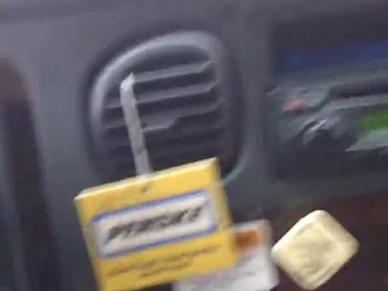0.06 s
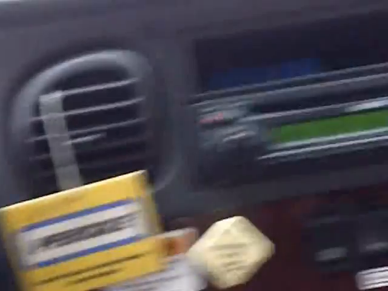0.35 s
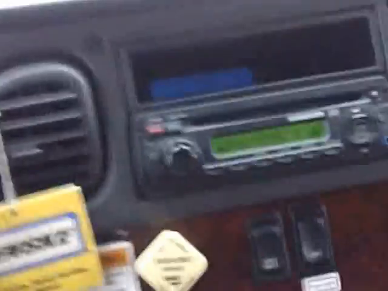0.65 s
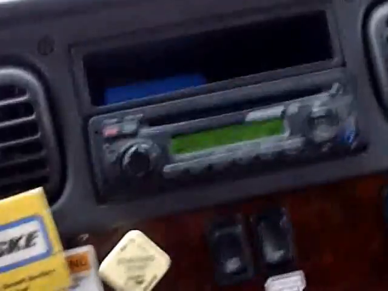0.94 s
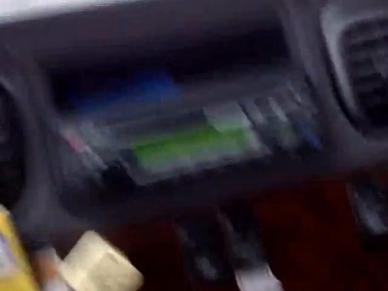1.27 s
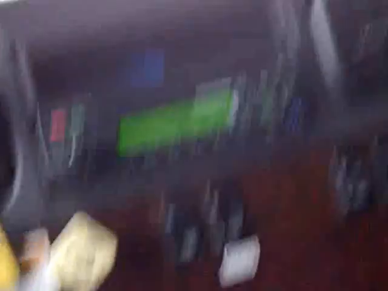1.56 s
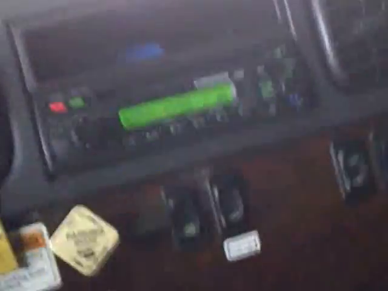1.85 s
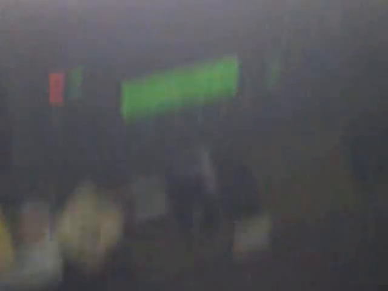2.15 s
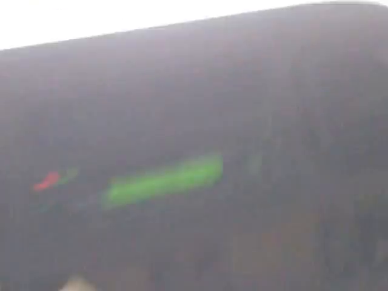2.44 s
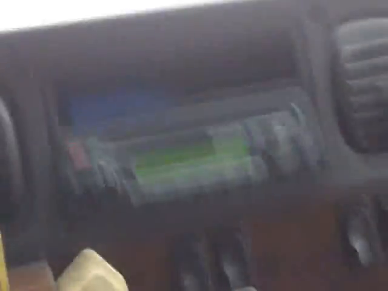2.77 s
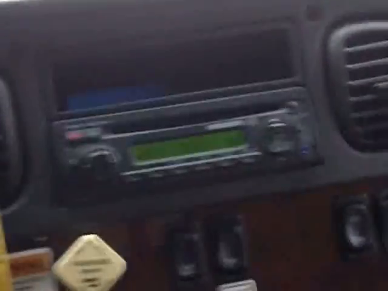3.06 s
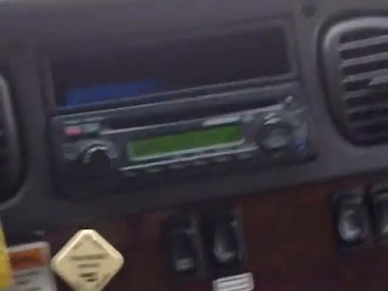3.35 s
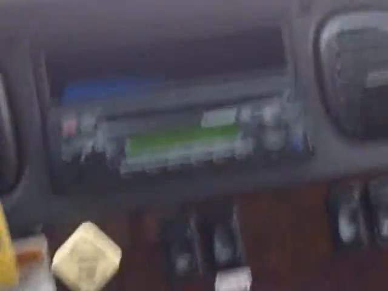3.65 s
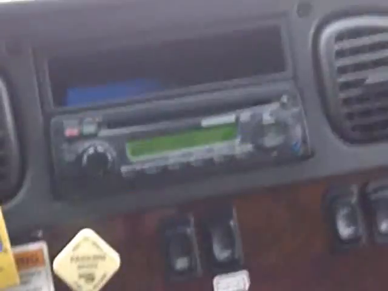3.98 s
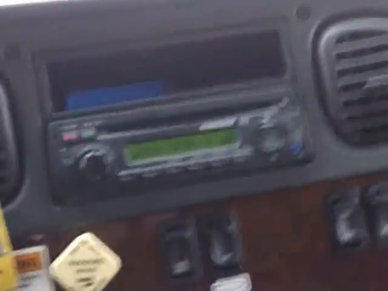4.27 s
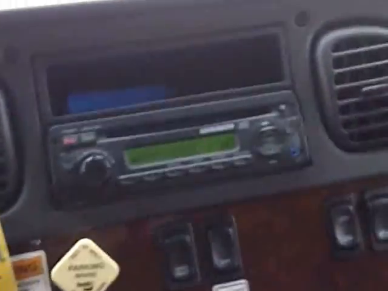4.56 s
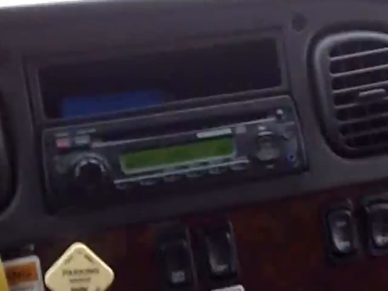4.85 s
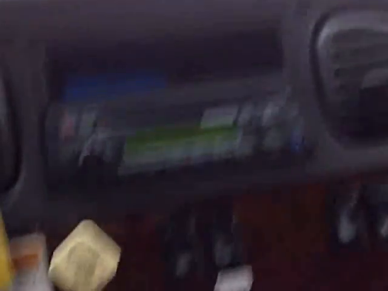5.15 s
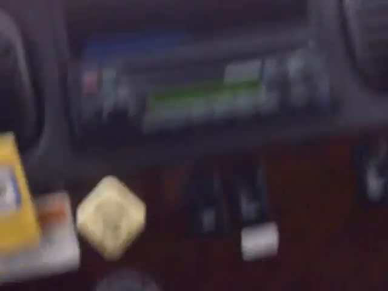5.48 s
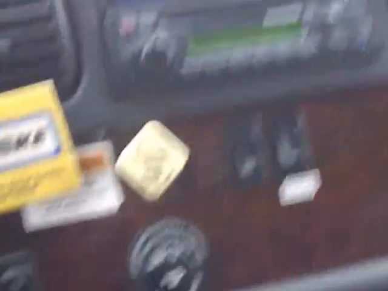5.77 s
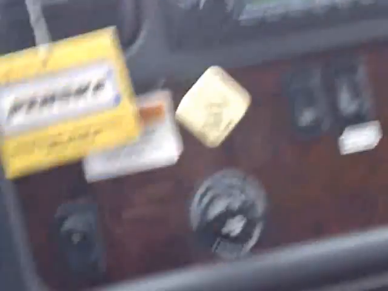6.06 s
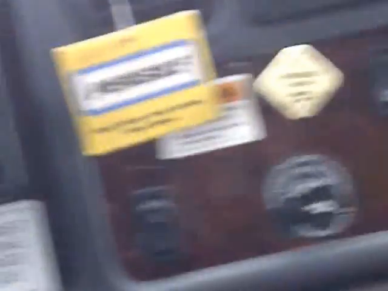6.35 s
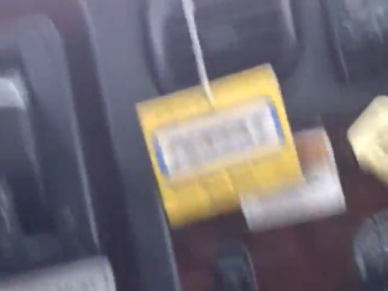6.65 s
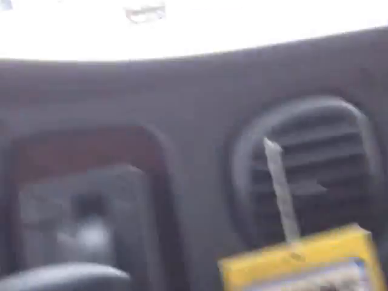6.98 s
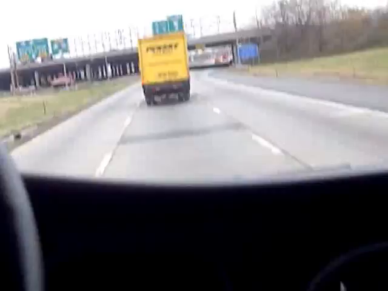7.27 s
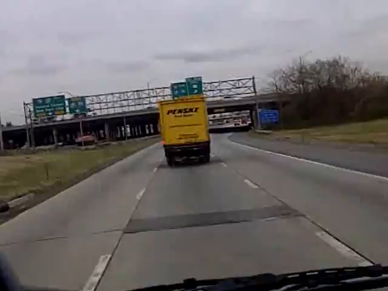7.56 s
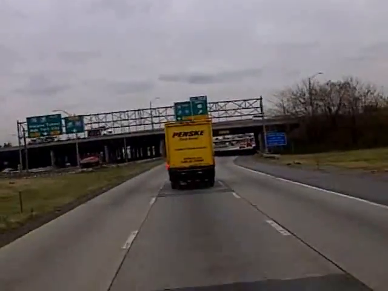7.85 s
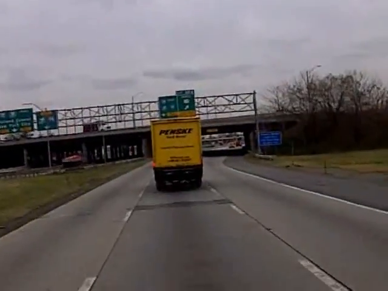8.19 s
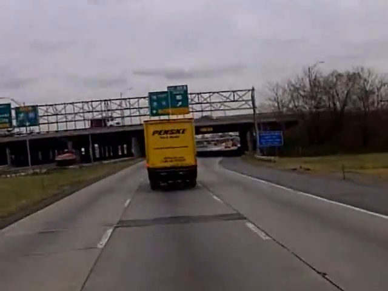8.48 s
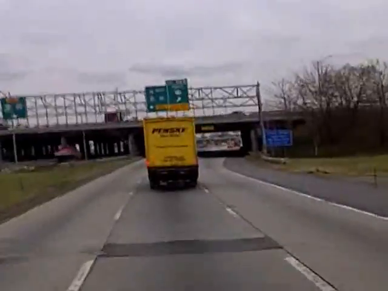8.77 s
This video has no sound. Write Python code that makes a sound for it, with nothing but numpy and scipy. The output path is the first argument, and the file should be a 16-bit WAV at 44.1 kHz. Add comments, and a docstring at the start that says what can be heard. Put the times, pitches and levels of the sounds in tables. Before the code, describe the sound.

Steady highway roar and low diesel hum in a truck cab, with bouts of thumping, knocking and rattling trim over road joints.

```python
"""Inside the cab of a box truck cruising on a concrete highway.
From the start, tyres and wind roar over the diesel's drone and a faint drivetrain whine, with thin
trim squeaks and scrapes. From 1.4 to 3.1 s road joints shake the cab: its shell thumps, loose panels
knock in quick runs, plastic trim rattles. Shorter bouts follow near 5.1, 6.4 and 7.5 s, the last with
a brief bright panel buzz. Two small sharp clicks sound close by at 8.2 and 8.4 s, then more jolts."""
import sys
import numpy as np
from scipy import signal
from scipy.fft import rfft, irfft
from scipy.io import wavfile

SR = 44100
rng = np.random.default_rng(int(sys.argv[2]) if len(sys.argv) > 2 else 0)


def wav_out(sig):
    """Save sig, one row per channel (or a flat mono array), as 16-bit PCM at SR to the path in sys.argv[1]."""
    wavfile.write(sys.argv[1], SR, np.round(np.clip(np.atleast_2d(sig).T, -1, 1) * 32767).astype(np.int16))


N = 393372
TIME = np.arange(N) / SR


def from_db(db):
    """Decibels to gain."""
    return 10 ** (np.asarray(db) / 20)


def unit_rms(x):
    """Scale to unit power."""
    return x / np.sqrt(np.mean(x ** 2) + 1e-20)


def curves(rows):
    """Each column after t/s, interpolated per sample."""
    times_s, *columns = np.transpose(rows)
    return [np.interp(TIME, times_s, column) for column in columns]


def add(out, start_s, sound):
    """Mix in a short sound."""
    at = max(round(start_s * SR), 0)
    out[at:at + len(sound)] += sound[:max(N - at, 0)]


def drift(rate_hz):
    """Smooth random wander, unit RMS."""
    hop, settle = 40, 2000
    pole = np.exp(-2 * np.pi * hop * rate_hz / SR)
    noise = rng.standard_normal(N // hop + settle + 2)
    slow = signal.lfilter([1], [1, -2 * pole, pole * pole], noise)[settle:]
    return np.interp(np.arange(N) / hop, np.arange(len(slow)), unit_rms(slow))


def colour(x, spectrum):
    """Minimum-phase filter through (f/Hz, level/dB) points; keeps the power of white noise."""
    size, skirt_db_per_oct = 16384, 18
    hz, db = np.transpose(spectrum)
    octave = np.log2(np.maximum(np.arange(size // 2 + 1) * SR / size, 1))
    outside_oct = np.abs(octave - np.clip(octave, np.log2(hz[0]), np.log2(hz[-1])))
    gain_db = np.interp(octave, np.log2(hz), db) - skirt_db_per_oct * outside_oct
    cepstrum = irfft(np.log(from_db(gain_db)))
    response = irfft(np.exp(rfft(2 * cepstrum[:size // 2], size)))
    return signal.fftconvolve(x, response / np.linalg.norm(response))[:len(x)]


def resonate(x, hz, width_hz):
    """One resonance, unit peak gain."""
    r = np.exp(-np.pi * width_hz / SR)
    feedback = [1, -2 * r * np.cos(2 * np.pi * hz / SR), r * r]
    return signal.lfilter(np.array([1, 0, -1]) * (1 - r * r) / 2, feedback, x + 1e-18)


def rush(spectrum, level_db):
    """Coloured turbulent noise."""
    return unit_rms(colour(rng.standard_normal(N), spectrum)) * from_db(level_db)


def chatter(rise_s, fall_s, grain_db):
    """One blow: a swarm of tiny uneven contacts that builds and dies; unit energy."""
    t = np.arange(SR // 8) / SR
    grains = from_db(grain_db * rng.uniform(-1.5, 1.5, len(t) // 32 + 1)).repeat(32)[:len(t)]
    burst = rng.standard_normal(len(t)) * grains * (1 - np.exp(-t / rise_s)) * np.exp(-t / fall_s)
    return burst / np.linalg.norm(burst)


# road roughness: t/s, level/dB
ROAD_ROUGHNESS = [(0.0, -29.5), (0.97, -30), (1.64, -25), (1.86, -28.5), (2.55, -19), (2.93, -22.5),
                  (3.1, -25), (3.63, -28.5), (4.0, -30.5), (6.23, -30.5), (6.53, -29.5), (7.05, -32.5),
                  (7.6, -28.5), (8.07, -31.5), (8.92, -25.5)]
def roughness_db(smooth_db=-30):
    """Roughness relative to smooth concrete."""
    return curves(ROAD_ROUGHNESS)[0] - smooth_db


# sway spectrum: f/Hz, level/dB
SWAY_SPECTRUM = [(14, -19.5), (19, -1), (24, 1), (32, 0.5), (45, -16), (70, -12.5)]
def sway(rough_db):
    """Cab air rocks on the suspension."""
    return rush(SWAY_SPECTRUM, -32 + 0.64 * rough_db)


# body boom and wall thud spectra: f/Hz, level/dB
BOOM_SPECTRUM = [(35, -18), (62, -3), (90, -2.5), (118, 2), (145, -7), (165, -1.5), (190, -0.5), (222, 1),
                 (280, -4), (335, -2.5), (420, -11.5), (600, -33)]
THUD_SPECTRUM = [(90, -11), (170, -1), (240, 1.5), (330, -3), (450, -16)]
# wall thud at each bump: t/s, level/dB
BUMP_THUDS = [(.641, -27.5), (1.141, -29.5), (1.483, -23.5), (1.637, -21), (2.4, -26), (2.728, -24),
              (2.913, -28), (3.058, -37.5), (5.106, -24.5), (6.38, -28), (7.56, -29.5), (8.656, -28)]
def body_boom(rough_db, half_swell_s=0.13):
    """The cab body booms; its wall's thud swells and settles around each bump."""
    boom = rush(BOOM_SPECTRUM, -26 + 0.27 * rough_db + 0.95 * drift(16))
    swells = [from_db(db) / (1 + ((TIME - at_s) / half_swell_s) ** 2) for at_s, db in BUMP_THUDS]
    return boom + rush(THUD_SPECTRUM, 0) * np.max(swells, axis=0)


# tyre spectrum: f/Hz, level/dB
TYRE_SPECTRUM = [(200, -2), (330, -6.5), (430, 0), (570, 1.5), (720, -2), (1150, -5), (1500, -11),
                 (1900, -15), (2400, -16), (3000, -25.5), (4500, -51.5)]
def tyre_roar(lift_db, shudder):
    """Tyres roar on concrete, fluttering with the cab's shudder."""
    return rush(TYRE_SPECTRUM, -29.5 + lift_db + 0.57 * shudder + 0.91 * drift(22))


# wind spectrum: f/Hz, level/dB
WIND_SPECTRUM = [(1800, -16.5), (3000, 3.5), (4300, 4.5), (5200, -2), (6200, -9), (7500, -26)]
def wind_hiss(lift_db, shudder):
    """Air hisses past the doors, fluttering with the cab's shudder."""
    return rush(WIND_SPECTRUM, -51.5 + lift_db + 0.4 * shudder + 1.4 * drift(4.9))


# floor drumming: t/s, level/dB
FLOOR_LEVEL = [(0, -47), (1.6, -36.5), (2.4, -24), (2.9, -33), (3.4, -52.5), (8.2, -36.5), (8.45, -23.5),
               (8.7, -24.5), (8.92, -24.5)]
def floor_drum():
    """The floor drums low over rough slabs."""
    broad = resonate(rng.standard_normal(N), hz=117, width_hz=64)
    narrow = resonate(broad, hz=111, width_hz=24)
    return unit_rms(narrow) * from_db(curves(FLOOR_LEVEL)[0])


# tread hum: t/s, f/Hz, level/dB
TREAD_TRACK = [(0, 346.4, -33), (.7, 343, -39), (1.3, 341, -54), (3.5, 337.8, -49), (5.5, 340, -38),
               (6.8, 334, -34.5), (7.5, 324.2, -33), (8.2, 311.3, -34), (8.92, 314.4, -29.5)]
def tread_hum():
    """The tread pattern hums as a narrow, unsteady noise band."""
    hz, db = curves(TREAD_TRACK)
    phase = 2 * np.pi * np.cumsum(hz) / SR
    return from_db(db) * unit_rms(drift(16) * np.sin(phase) + drift(8.8) * np.cos(phase))


# diesel firing: t/s, f/Hz, level/dB
FIRING_TRACK = [(0, 111.4, -30.5), (.8, 110.2, -39.5), (1.5, 116.9, -30.5), (2.8, 118.5, -45.5),
                (3.6, 116.6, -31.5), (5, 113.9, -38), (6.4, 121.4, -37), (7.4, 114.2, -32.5),
                (8.2, 119.6, -36), (8.92, 116.1, -31)]
# engine orders: multiple of firing rate, level/dB
ENGINE_ORDERS = [(.5, -2.5), (1, -1), (1.5, -7), (2, -18.5), (2.5, -12.5), (3, -13)]
def diesel():
    """Low firing orders come through the bulkhead, each wavering."""
    firing_hz, level_db = curves(FIRING_TRACK)
    phase = 2 * np.pi * np.cumsum(firing_hz * (1 + 0.01562 * drift(11.1))) / SR
    drone = sum(from_db(db + 3.4 * drift(9.8)) * np.sin(order * phase) for order, db in ENGINE_ORDERS)
    return unit_rms(drone) * from_db(level_db)


# whine: t/s, f/Hz, level/dB
WHINE_TRACK = [(0, 2290, -62), (3.3, 2300, -61), (4.3, 2295, -53), (5.6, 2270, -53), (6.7, 2275, -49.5),
               (7.1, 2275, -62), (8.92, 2275, -66)]
def drivetrain_whine():
    """The drivetrain gives a thin, wavering tone."""
    hz, db = curves(WHINE_TRACK)
    phase = 2 * np.pi * np.cumsum(hz * (1 + 0.011 * drift(48))) / SR
    return unit_rms(np.sin(phase) * from_db(2.8 * drift(12))) * from_db(db)


# trim and panel tones: centre t/s, half length/s, f/Hz, level/dB, noise share/0-1
THIN_TONES = [(.043, .03, 2830, -50, .35), (.625, .018, 6200, -53, .4), (0.668, .04, 5660, -54, .45),
              (.73, .02, 2850, -44, .3), (1.789, .018, 2820, -41.5, .4), (2.05, .04, 5780, -52, .45),
              (2.696, .012, 4500, -36, .7), (4.735, .025, 3050, -48, .35), (4.89, .02, 2900, -48, .35),
              (5.71, .04, 3150, -51, .6), (5.71, .02, 5200, -52, .55), (5.725, .06, 5900, -56, .8),
              (6.081, .022, 2930, -45, .25), (6.837, .05, 5570, -55, .95), (7.143, .022, 2860, -47, .6),
              (7.54, .016, 2550, -36, .75), (7.585, .022, 2520, -32, .65), (7.82, .045, 2750, -46, .5),
              (7.83, .08, 5810, -55, .4)]
def trim_and_panel_tones(sag=0.008, unsteadiness=0.012):
    """Thin trim squeaks and scrapes, plus a brief bright buzz from panels knocked near 7.55 s."""
    out, waver, noise = np.zeros(N), drift(90), rng.standard_normal(N)
    for centre_s, half_s, hz, db, noise_share in THIN_TONES:
        near = np.abs(TIME - centre_s) < half_s
        progress = (TIME[near] - centre_s) / half_s
        pitch_hz = hz * (1 - sag * progress + unsteadiness * waver[near])
        tone = unit_rms(np.sin(2 * np.pi * np.cumsum(pitch_hz) / SR))
        rasp = unit_rms(resonate(noise[near], hz, width_hz=hz / 7))
        blend = unit_rms((1 - noise_share) * tone + noise_share * rasp)
        out[near] += from_db(db) * np.cos(np.pi / 2 * progress) ** 2 * blend
    return out * from_db(4 * drift(70))


# louder rattles: t/s, level/dB
TRIM_RATTLES = [(0.5841, -37), (1.362, -36), (1.712, -25), (2.377, -34), (2.535, -32), (2.957, -24.5),
                (3.013, -33), (3.1172, -28.5), (3.4124, -35), (3.4555, -29), (3.8096, -34.5), (3.8878, -32),
                (4.0059, -23.5), (5.059, -33), (5.159, -27), (5.255, -39), (6.4014, -34.5), (6.442, -35),
                (6.535, -33.5), (6.585, -37), (7.455, -36), (7.527, -29), (7.656, -30), (7.719, -38),
                (7.771, -36), (8.457, -38), (8.537, -39)]
# rattle spectrum: f/Hz, level/dB
RATTLE_SPECTRUM = [(700, 2), (1500, 12), (2500, 3.5), (4300, 4.5), (5500, -3), (7500, -20)]
def trim_rattles(rough_db, faint_per_s=10, makeup_db=25):
    """Light plastic parts buzz briefly; faint ones go on at random, harder on rough road."""
    contacts = np.zeros(N)
    faint_db = -42.5 + rough_db + 2 * rng.standard_normal(N)
    faint = [(i / SR, faint_db[i]) for i in np.flatnonzero(rng.random(N) < faint_per_s / SR)]
    for at_s, db in list(TRIM_RATTLES) + faint:
        burst = chatter(rise_s=0.0026, fall_s=0.0092, grain_db=2)
        add(contacts, at_s - 0.001, burst * from_db(db + makeup_db))
    return colour(contacts, RATTLE_SPECTRUM)


# click contacts: t/s, level/dB, tilt/(dB/oct)
CLICK_HITS = [(8.206, -28, 2), (8.213, -16, -6), (8.2228, -8, 0), (8.2262, -21, -5), (8.43, -12, 3),
              (8.4347, -17.5, 1.5)]
# plastic modes: f/Hz, level/dB, T60/s
PLASTIC_MODES = [(865, -7, 0.02), (1660, -9, .014), (2540, -23, 0.0072), (3600, -8.5, 0.007),
                 (5060, -11, 0.0046)]
# snap spectrum: f/Hz, level/dB
SNAP_SPECTRUM = [(500, 8.5), (1500, 7), (3000, -4), (5000, -2), (7000, -19.5)]
def clicks(snap_s=0.0015):
    """Small hard plastic contacts close by: a snap and a very short ring."""
    out, t = np.zeros(N), np.arange(SR // 40) / SR
    for at_s, level_db, db_per_oct in CLICK_HITS:
        tilt_db = lambda hz: db_per_oct * np.log2(hz / PLASTIC_MODES[0][0])
        ring = sum(np.sin(2 * np.pi * hz * t) * from_db(db + tilt_db(hz) - 60 * t / t60_s)
                   for hz, db, t60_s in PLASTIC_MODES)
        burst = rng.standard_normal(len(t)) * np.exp(-t / snap_s)
        snap = colour(burst, [(hz, db + tilt_db(hz)) for hz, db in SNAP_SPECTRUM])
        add(out, at_s, from_db(level_db) * (ring + 0.75 * snap))
    return out


# hardest jolts: t/s, peak level/dB, tilt/(dB/oct)
JOLTS = [(1.484, -14, -2), (2.417, -15.5, -1), (2.449, -15, 5), (2.523, -14, -2), (2.713, -15, -1),
         (2.847, -12, -5), (2.881, -10.5, 4), (3.101, -11, -2), (5.106, -15, -2), (5.155, -17, 7),
         (7.518, -9, 21), (7.573, -13, 2), (7.615, -17, -5), (8.653, -9.5, 11), (8.693, -9, -17),
         (8.823, -13, -26)]
# shell modes: f/Hz, level/dB, T60/s
SHELL_MODES = [(116.7, -6.5, 0.12), (221, -4.5, 0.083), (308, -4.5, 0.05)]
def shell_thumps(rise_s=0.0017):
    """A jolt is a soft push on the cab's shell, which booms for a few cycles."""
    out, t = np.zeros(N), np.arange(SR // 6) / SR
    for at_s, peak_db, db_per_oct in JOLTS:
        boom = np.zeros(len(t))
        for hz, db, t60_s in SHELL_MODES:
            mode_db = db + db_per_oct * np.log2(hz / SHELL_MODES[0][0]) - 60 * t / t60_s
            boom += np.sin(2 * np.pi * (hz * t + rng.random())) * from_db(mode_db)
        boom *= 1 - np.exp(-t / rise_s)
        add(out, at_s, from_db(peak_db) * boom / np.abs(boom).max())
    return out


# panel modes: f/Hz, width/Hz, level/dB
PANEL_MODES = [(345, 74, -6.5), (578, 40, 5.2), (680, 55, -3.5), (792, 70, -2.5), (949, 84, -7),
               (1125, 75, -1.5), (1292, 70, -3.2), (1460, 80, -4.8), (1600, 110, -8), (1720, 55, -6),
               (2000, 40, -14.5), (2300, 130, -12.5), (2520, 160, -10)]
def panel_ring(force, db_per_oct, spread_db, detune=0):
    """Padded panels ring under a force; mode levels scatter, and pitches by the fraction `detune`."""
    ring, t = np.zeros(len(force)), np.arange(SR // 12) / SR
    for hz, width_hz, db in PANEL_MODES:
        mode_hz = hz * (1 + detune * rng.standard_normal())
        mode = np.sin(2 * np.pi * (mode_hz * t + rng.random())) * np.exp(-np.pi * width_hz * t)
        mode_db = db + db_per_oct * np.log2(hz / PANEL_MODES[0][0]) + spread_db * rng.standard_normal()
        ring += from_db(mode_db) * unit_rms(signal.oaconvolve(force, mode)[:len(force)])
    return signal.sosfilt(signal.butter(4, [250, 2900], "band", fs=SR, output="sos"), ring)


def panel_mutter(lift_db, shudder):
    """The shudder keeps loose panels muttering softly."""
    force = rng.standard_normal(N) * from_db(7.6 * np.tanh(shudder))
    return unit_rms(panel_ring(force, db_per_oct=-4.5, spread_db=7.5)) * from_db(-38.5 + lift_db)


def panel_slap(db_per_oct, detune=0.022, buzz_delay_s=0.00302, buzz_db=0.6):
    """One firm contact, then a buzz of smaller ones; unit energy."""
    firm = chatter(rise_s=0.00087, fall_s=0.0016, grain_db=1.5)
    strike = panel_ring(firm, db_per_oct - 1.9, spread_db=2, detune=detune)
    small = chatter(rise_s=0.0027, fall_s=0.011, grain_db=4.5)
    buzz = panel_ring(small, db_per_oct + 1, spread_db=3, detune=detune)
    buzz = np.pad(buzz, (round(buzz_delay_s * SR), 0))[:len(strike)]
    slap = unit_rms(strike) + from_db(buzz_db) * unit_rms(buzz)
    return slap / np.linalg.norm(slap)


# knocks: t/s, ring level/dB, crack level/dB
PANEL_KNOCKS = [(.187, -10.5, -54), (.233, -13, -55), (.306, -17.5, -56), (.585, -15, -48),
                (.641, -11.5, -46), (.722, -19, -56), (1.406, -10.5, -32), (1.436, -6.5, -34),
                (1.483, -4, -29.5), (1.534, -13, -50), (1.635, -6, -30), (1.641, -3.5, -31.5),
                (1.682, -6, -40), (2.36, -13, -48), (2.417, -11, -36), (2.449, -2.5, -31), (2.502, -9, -38),
                (2.651, -22, -51), (2.7, -7, -35), (2.728, -1, -24.5), (2.788, -1.5, -30),
                (2.815, -7.5, -39), (2.862, -2, -30), (2.911, -1.5, -35), (2.922, -5, -27), (2.969, 0, -36),
                (2.989, -14, -36), (3.009, -21, -50), (3.056, -6, -44), (3.097, -6, -32), (3.14, -12, -39),
                (4.357, -15.5, -53), (4.522, -14, -55), (4.552, -9, -51), (5.063, -9.5, -40),
                (5.106, -3, -29), (5.149, -4.5, -41), (5.197, -11, -41.5), (6.355, -10, -43),
                (6.404, -11, -45), (6.424, -18, -52), (6.45, -12, -47), (6.494, -11, -44),
                (6.594, -19, -57), (7.047, -18, -56), (7.164, -18.5, -63), (7.206, -16, -54),
                (7.254, -16, -46), (7.532, -8, -41.5), (7.572, -6, -38), (7.613, -7.5, -37),
                (8.487, -9.5, -43), (8.549, -9.5, -43), (8.654, -6.5, -31), (8.688, -9, -35.5),
                (8.859, -12, -44), (8.884, -11, -39)]
# contact crack spectrum: f/Hz, level/dB
CRACK_SPECTRUM = [(1000, -1), (2500, 0), (3200, -1.5), (4300, -0.5), (5300, -7.5), (6500, -12.5),
                  (7500, -25.5)]
def panel_knocks(ring_makeup_db=17.5, crack_makeup_db=27):
    """Bumps make loose panels knock in runs, with a ring and a crack; harder contacts ring brighter."""
    rings, cracks = np.zeros(N), np.zeros(N)
    for at_s, ring_db, crack_db in PANEL_KNOCKS:
        db_per_oct = np.clip(0.21 * (crack_db - ring_db + 26.5), -2, 1.5)
        add(rings, at_s, panel_slap(db_per_oct) * from_db(ring_db + ring_makeup_db))
        crack = chatter(rise_s=0.0059, fall_s=0.013, grain_db=0.5)
        add(cracks, at_s, crack * from_db(crack_db + crack_makeup_db))
    return rings + colour(cracks, CRACK_SPECTRUM)


def cab_reverb(x, t60_s=0.26, wet_db=-12.5, gap_s=0.004):
    """The small padded cab adds a short dense tail."""
    t = np.arange(SR // 4) / SR
    tail = rng.standard_normal(len(t)) * from_db(-60 * t / t60_s) * (t > gap_s)
    return x + from_db(wet_db) * signal.fftconvolve(x, tail / np.linalg.norm(tail))[:N]


def scene():
    """Mono mix at the seat."""
    rough_db = roughness_db()
    lift_db = 0.73 * rough_db
    shudder = unit_rms(resonate(rng.standard_normal(N), hz=21, width_hz=9.3))
    bed = sway(rough_db) + body_boom(rough_db)
    bed += tyre_roar(lift_db, shudder) + wind_hiss(lift_db, shudder)
    bed += floor_drum() + panel_mutter(lift_db, shudder)
    bed += tread_hum() + diesel() + drivetrain_whine()
    close = clicks()
    shaken = trim_and_panel_tones() + panel_knocks() + shell_thumps() + trim_rattles(rough_db)
    return (bed + close + cab_reverb(shaken))[None]


def record(dry):
    """Soft clip, then steep low-pass."""
    cutoff_hz = 7250
    rounded = 0.94 * np.tanh(dry / 0.96)
    return signal.sosfilt(signal.ellip(10, 0.2, 80, cutoff_hz, fs=SR, output="sos"), rounded)


dry = scene()
out = record(dry)
wav_out(out)
```